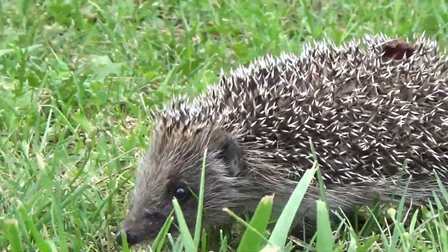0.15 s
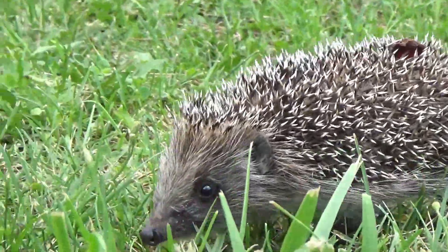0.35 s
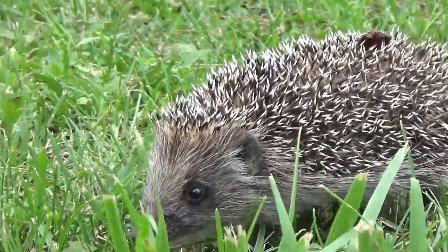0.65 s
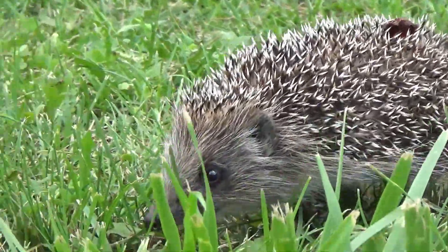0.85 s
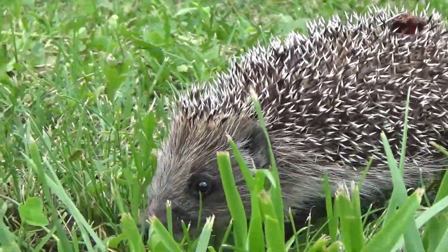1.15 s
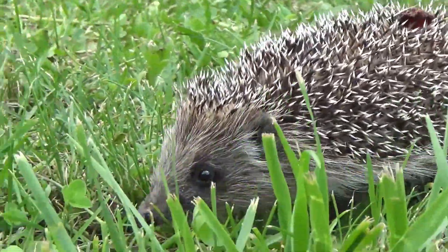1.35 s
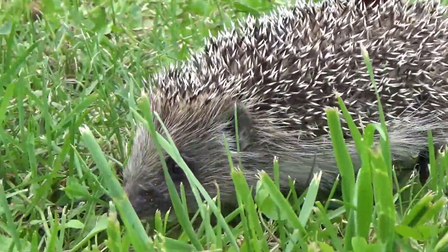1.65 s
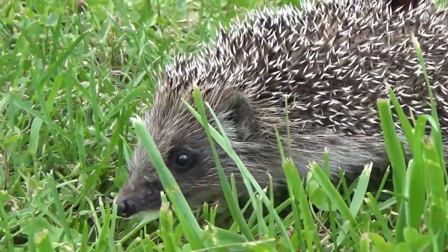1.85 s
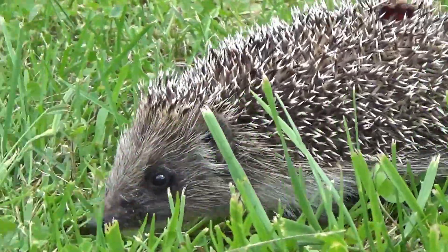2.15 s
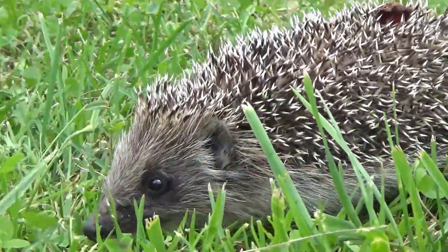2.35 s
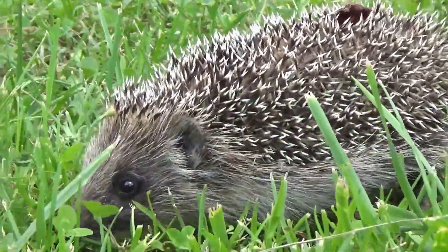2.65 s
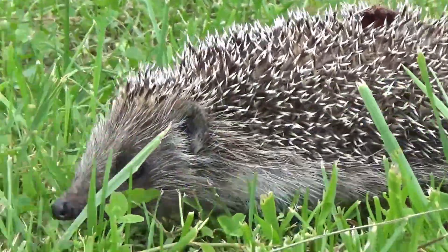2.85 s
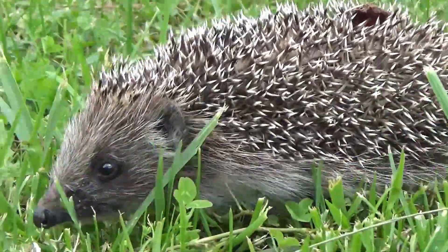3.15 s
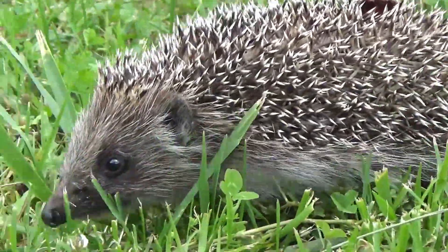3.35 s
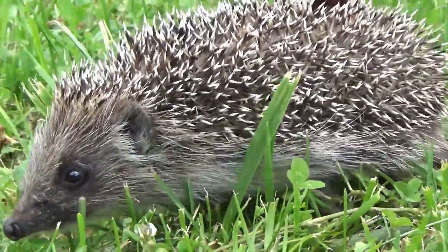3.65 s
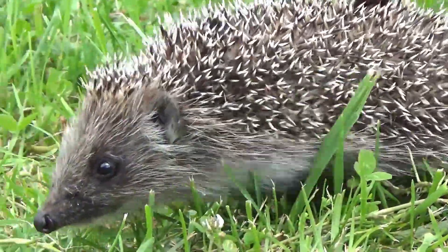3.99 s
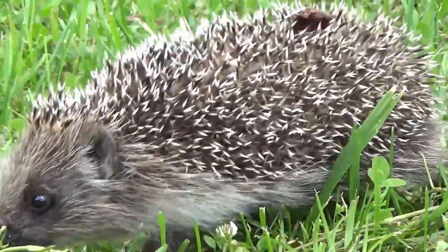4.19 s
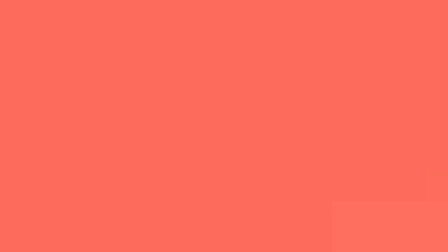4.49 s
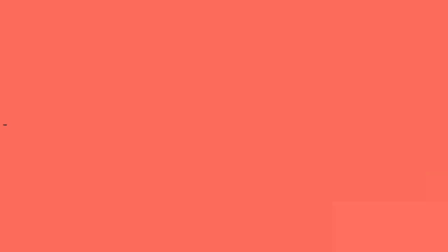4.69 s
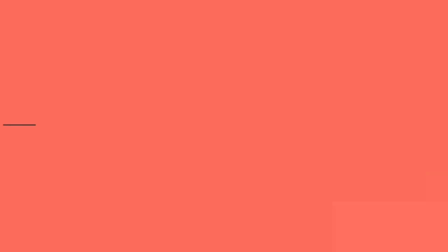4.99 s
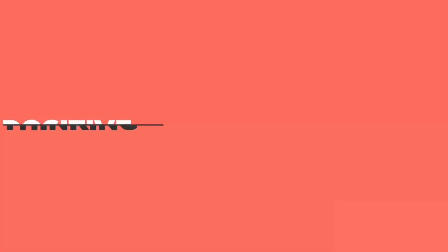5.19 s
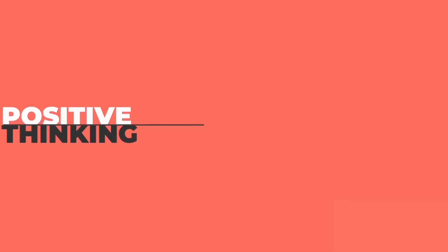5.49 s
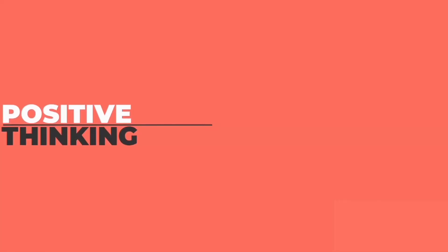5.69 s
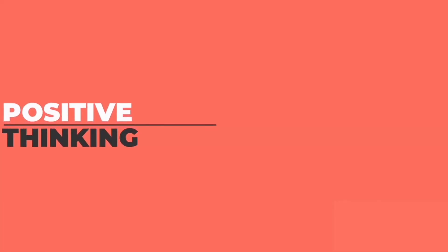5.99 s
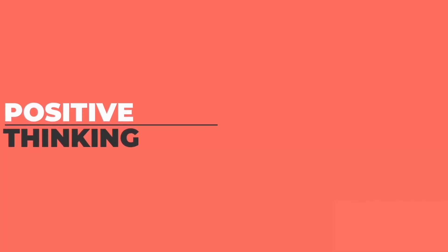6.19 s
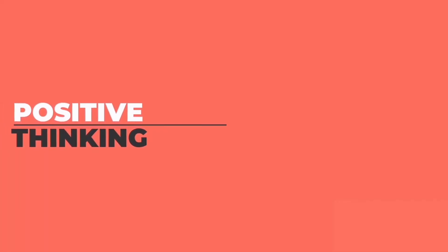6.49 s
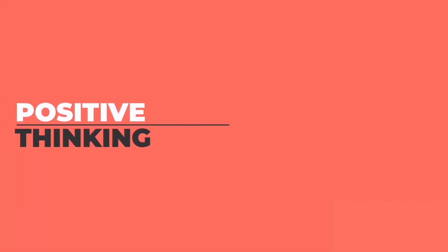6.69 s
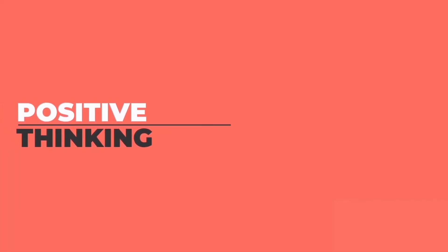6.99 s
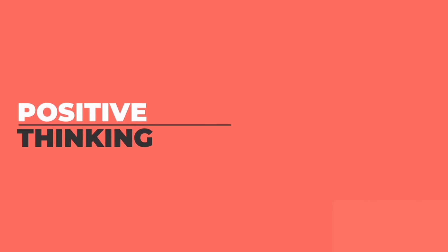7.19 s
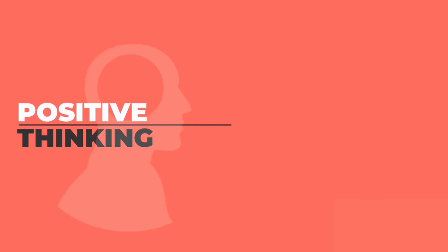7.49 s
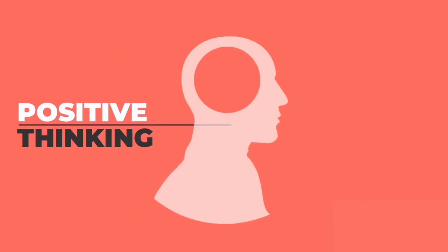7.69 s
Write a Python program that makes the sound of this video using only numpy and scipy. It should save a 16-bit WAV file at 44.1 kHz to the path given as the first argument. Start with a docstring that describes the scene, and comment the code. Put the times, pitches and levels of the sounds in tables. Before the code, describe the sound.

A wide, steady hush of leaves and far air runs throughout, with faint insect bands, flickering thin treble and barely felt low wind. A soft high cricket trills for a quarter second roughly every 0.65 s, from 0.2 to 3.7 s. Faint chirps and weak squawks dot the opening. At 2.65 s a clear whistling bird begins seven short notes, stepping slightly downward and weakening until 3.9 s; hoarse squawks overlap around 2.8-3.1 s. Small breathy chirps cluster near 4-5.2 s. Rough squawks return from 5.2 s, and at 5.3 and 5.55 s two loud raspy screeches erupt close by, the first arching up and down. A long hoarse squawk swells around 5.9 s, more near 6.4-6.6 s. Four fluttering upward whistles start at 6.1, 6.5, 6.9 and 7.25 s, the last cut short. Garden echoes and a faint squawk close at 7.8 s.

```python
"""Hoarse squawks, far and near, in a garden: rough pulses and puffs of air ring a throat's resonances.
Purer birds join them: a falling row of whistles and four upward slurs, near sines with weak overtones.
Faint chirps from farther off blend tone with narrow noise; a cricket trills as a tone cut into strokes.
Sparse decaying taps give the echoes; shaped noise gives leaves, far air, insect bands, thin treble and
a light wind on a pair of microphones."""
import sys
import numpy as np
from scipy import signal
from scipy.io import wavfile
from scipy.ndimage import uniform_filter1d, minimum_filter1d

SR = 44100
rng = np.random.default_rng(int(sys.argv[2]) if len(sys.argv) > 2 else 0)


def generate_wav(signal):
    """Clip the signal to [-1, 1] and save it as 16-bit WAV at the path in sys.argv[1]."""
    frames = np.transpose(np.atleast_2d(signal))
    scaled = np.clip(frames, -1, 1) * 32767
    pcm = np.round(scaled).astype(np.int16)
    wavfile.write(sys.argv[1], SR, pcm)


N = 345744  # samples

# In every table pan_db is left over right.
# Far squawks: start_s, rise_s, fall_s, peak_effort_db, pitch_hz, pan_db, roughness (0-1),
# beak_opening (factor), brightness_db_per_octave, bite_db
FAR_SQUAWKS = [(0.0, 0.0054, 0.16, -35, 420, -10, 0.35, 1.15, -0.5, -2),
               (1.35, 0.16, 0.056, -38.5, 465, 27, 0.45, 1.12, 4, 7),
               (1.74, 0.033, 0.05, -33, 532, 27, 0.33, 0.96, 2, 16),
               (2.75, 0.045, 0.13, -33.5, 424.7, 7, 0.25, 1.08, -4.5, -5.5),
               (2.815, 0.085, 0.08, -27.5, 400, 18, 0.4, 0.96, 0, 7),
               (2.955, 0.077, 0.053, -21, 436.3, 12, 0.39, 0.98, 5.5, 8),
               (3.09, 0.049, 0.054, -26.5, 401.6, 17, 0.65, 1.02, -2.5, 0.5),
               (4.86, 0.056, 0.26, -34.5, 398.2, 3, 0.36, 0.93, 0, -4),
               (5.214, .05, .04, -24, 354.2, 0, .5, 0.97, -4.5, 7.5),
               (5.49, 0.045, .035, -20, 492.3, 3, 0.59, 1.085, 1.5, 6.5),
               (5.93, .25, 0.16, -21.5, 418, 10.5, 0.71, 1.074, -2, -3.5),
               (6.43, 0.12, 0.099, -22.5, 420.7, 14, 0.35, 1.08, -3.5, -7.5),
               (6.585, 0.095, 0.11, -26, 439, 13, 0.35, 1, 4, -1),
               (7.6, 0.11, 0.15, -39.5, 450, -15, 0.41, 0.89, 8, 5)]
SQUAWK_EDGE_DB, SQUAWK_ARCH, BEAK_ARCH = -12, .08, 0.14  # at both ends: effort; droop of pitch, beak (shares)
# Throat resonances of the far squawks: centre_hz, width_hz, level_db
FAR_THROAT = [(970, 595, -4.5), (1634, 460, 5.5), (2484, 740, -1), (3180, 1080, -5), (3760, 630, -8),
              (4760, 1050, -11.5), (6080, 770, -24.5)]

# Nearest bird, one table a screech: time_s, effort_db, pitch_hz, roughness (0-1),
# brightness_db_per_octave, bite_db
NEAR_SCREECHES = [
    [(5.295, -30, 535, .12, -3, 12), (5.315, -21, 591.8, .13, 2, 11.5), (5.343, -15, 716.7, 0.24, -4, 1.5),
     (5.37, -12, 689.3, .58, -1.5, 3), (5.405, -11.5, 600, .58, -2.5, 1),
     (5.445, -15.5, 496.4, 0.28, -1, 2), (5.49, -30.5, 418, 0.24, 6, -4)],
    [(5.535, -20, 438, 0.5, -5, 6), (5.552, -15, 514.6, 0.28, 1.5, 5), (5.572, -16, 600.6, 0.25, -4, 2.5),
     (5.59, -12.5, 558, 0.37, -3, 4), (5.602, -17.5, 567.5, 0.42, -1.5, 0),
     (5.622, -15, 516.5, 0.45, -3, 1), (5.64, -44.5, 480, 0.2, 2, -2)],
]
# Throat with the beak wide open, first screech: centre_hz, width_hz, level_db
WIDE_THROAT = [(1225, 810, -3), (2130, 600, 5.5), (3020, 570, 3), (4540, 800, -13), (5130, 630, -9),
               (6150, 600, -20.5)]
# Throat with the beak half shut, second screech: centre_hz, width_hz, level_db
HALF_SHUT_THROAT = [(990, 540, -20), (1590, 280, 9), (2580, 800, -2), (3560, 1000, -7), (5020, 1200, -12.5)]
BEAK_REST_HZ, BEAK_FOLLOW, NEAR_PAN_DB = 576, 0.76, -2.5  # the beak opens as the pitch climbs

BITE_HZ, BITE_OCTAVES = 2780, 0.27  # where a strained throat bites
THROAT_DRIFT, THROAT_SWAY_DB, CRACK_DB = .035, 1.8, 2.6  # drift is a share of each resonance's centre
SKULL_HZ, SKULL_FOLLOW = 4000, .2  # resonances above this hardly move with the beak
PITCH_SWAY = .04  # slow waver of the pitch, a share, scaled by roughness

# Level whistles: start_s, length_s, pitch_hz, drift_hz_per_s, level_db, dip_db (mid-note), pan_db
WHISTLE_NOTES = [(2.655, 0.15, 3630, 298, -17.5, 0, 4.5), (2.955, 0.13, 3570, 101, -18.5, 0, -4),
                 (3.174, 0.11, 3532, -800, -24, -11, 0), (3.354, 0.11, 3492, -600, -23, -6, 4),
                 (3.524, 0.11, 3448, -500, -22.5, -7, -4), (3.686, 0.11, 3382, -1200, -25, -3, -2),
                 (3.847, 0.06, 3336, -1800, -30, 0, 8)]
# Partials of a whistle: multiple, level_db
WHISTLE_PARTIALS = [(1, 1), (2, -27.5), (3, -31)]
WHISTLE_ATTACK, WHISTLE_RELEASE_S = .25, 0.026  # attack is a share of the length
WHISTLE_EDGE_DB, WHISTLE_SWELL_DB = -19.5, 2.5
SCOOP_HZ, SCOOP_S = 254, 0.0372  # the pitch scoops up to the note
DIP_AT, DIP_S = 0.524, 0.0062  # share of the length, half width

# Upward slurs: start_s, slowness (factor), level_db, broken_off_after_s, overtone_fade_db_per_s
SLUR_CALLS = [(6.077, 1.054, -14.5, .4, -45), (6.48, 0.97, -15.5, .4, -30), (6.863, 1.0, -15.5, .4, -7),
              (7.258, 1.02, -16.5, .21, -83)]
# Course of one slur before stretching: time_s, pitch_hz, level_db, flutter (0-1)
SLUR_COURSE = [(0, 2164, -2, 0), (.022, 2175, -1.5, 0.07), (.085, 2415, 2, 0.23), (.108, 2532, -10.5, 0.9),
               (.165, 2710, -10, 0.45), (.23, 2887, -12.5, 0), (.29, 2955, -13, 0), (.31, 2940, -6.5, 0.2),
               (.334, 2480, 1, 0.15), (.343, 2500, -23, 0)]
SLUR_OVERTONE_DB = -23.5  # the octave at the start of a slur

# Chirps of farther birds: start_s, length_s, first_pitch_hz, last_pitch_hz, upward_bend_hz,
# level_db, unsteadiness (0-1)
FAR_CHIRPS = [(0, 0.54, 6220, 6400, 2.5, -46, 0.38), (.07, .045, 1310, 1310, 5, -38, 0.1),
              (0.1, 0.32, 3480, 3500, 30.5, -47, 0.13), (0.256, 0.055, 1180, 1140, -2, -40, 0.14),
              (0.42, 0.054, 1093, 1054, -6, -43.5, 0.2), (0.441, 0.093, 2620, 2495, 13.5, -42.5, 0.5),
              (0.83, 0.16, 1164, 1033, -9.5, -41.5, 0.1), (1.793, 0.058, 3450, 3400, 0, -48, 0.1),
              (3.925, 0.087, 3250, 2600, -58, -37.5, 0.88), (4.004, 0.071, 3010, 2160, 9, -37.5, 0.8),
              (4.159, 0.19, 1520, 1458, 7, -43.5, 0.76), (4.497, 0.08, 2230, 2300, 298.5, -36.5, 0.75),
              (4.546, 0.041, 3400, 3640, 50, -41, 0.85), (4.552, 0.079, 1300, 1270, 34, -39, 0.5),
              (4.556, 0.085, 2440, 2470, 252, -39, .75), (4.577, .045, 3900, 3920, 300, -42, 0.9),
              (4.875, .04, 3650, 4000, 100, -40, 0.24), (4.884, 0.079, 2600, 2410, 50, -44, 0.5),
              (4.886, 0.053, 5440, 4900, -3, -40, 0.77), (4.912, 0.038, 3720, 3440, -9, -35.5, 0.42),
              (5.082, 0.1, 736, 783, 20.5, -32.5, 0.12), (5.1, 0.099, 4480, 4620, 54, -42, 0.25),
              (5.145, 0.04, 3760, 3660, 31, -32, 0.62), (5.15, 0.057, 2450, 2370, 112, -36.5, 0.7),
              (5.163, 0.034, 5100, 5100, -4, -40, 0.7), (5.171, .055, 1150, 1103, 17, -32, 0.15),
              (6.639, 0.11, 3680, 3620, 40, -34.5, 0.63), (6.648, .08, 4700, 4840, 58, -33, 0.9),
              (7.508, .035, 2200, 2180, 5, -38, .5)]
BLUR_HZ = 262  # width of a chirp's smear at full unsteadiness

# Cricket trills: start_s, end_s, level_db
CRICKET_TRILLS = [(0.18, .44, -49), (0.802, 1.065, -48.5), (1.503, 1.765, -49.5), (2.151, 2.41, -48.5),
                  (2.825, 3.08, -47), (3.478, 3.735, -48.5)]
CRICKET_HZ, STROKES_PER_S = 7120, 43.0

# Echo decay of trees and walls: frequency_hz, t60_s
GARDEN_DECAY = [(300, 2.5), (1500, 1.21), (3500, 1.67), (8000, 1.55)]

# Spectrum shape of leaves and far air: frequency_hz, relative_level_db_per_hz
HUSH_SPECTRUM = [(15, -61.5), (25, -2), (102, -25.5), (132, -12), (589, -0.5), (679, -2), (1120, 0.5),
                 (1320, -0.5), (1930, 0), (2510, -7), (4230, -12), (5230, -15.5), (7300, -18), (9490, -49),
                 (16100, -120)]
HUSH_DB = -34
# Swell of the hush, added to its level: time_s, swell_db
HUSH_SWELLS = [(0, 4.5), (.6, -0.56), (2.6, 1.05), (3.3, 1), (4.4, 1.6), (5.7, 4), (7.0, 2), (7.84, 1)]
# Likeness of the hush in left and right: frequency_hz, likeness (-1 to 1)
HUSH_LIKENESS = [(60, -0.62), (180, -0.61), (550, -0.21), (1650, -0.8), (4970, -0.31), (15000, 1)]
# Steady insect bands and a low hum: centre_hz, width_hz, level_db
DRONE_BANDS = [(99.7, 8.8, -66), (4210, 570, -51.5), (6854, 300, -53)]
# Spectrum shape of the thin flickering treble: frequency_hz, relative_level_db_per_hz
FIZZ_SPECTRUM = [(7300, -51), (7500, -3.5), (8300, -20), (8700, -40), (9100, -10), (9400, -4.5),
                 (10000, -6), (10300, -14), (11000, -9.5), (12500, -0.5), (14800, -1.5), (15700, -13)]
FIZZ_DB = -54.5
# Likeness of the treble in left and right: frequency_hz, likeness (-1 to 1)
FIZZ_LIKENESS = [(8000, -0.24), (9300, 0.56), (10200, 0.58), (11500, -0.53), (15000, -0.43)]
# Low wind on the microphones: time_s, level_db
BREEZE_LEVEL = [(0, -66), (2.4, -79), (2.8, -60), (3.5, -57), (4.1, -74), (7.84, -66)]
EDGE_HZ = 15800  # upper band limit


def gain_of(db):
    """Decibels to gain."""
    return 10 ** (np.asarray(db) / 20)


def evened(x):
    """Scales to rms 1."""
    return x / np.sqrt(np.mean(x ** 2) + 1e-20)


def read(points, hz):
    """Reads a spectrum on a log-frequency axis."""
    f, value = np.transpose(points)
    return np.interp(np.log(hz + 1), np.log(f + 1), value)


def unroll(rows):
    """Start time and the columns of a table, one value a sample."""
    s, *columns = np.transpose(rows)
    t = np.arange(s[0], s[-1], 1 / SR)
    return s[0], [np.interp(t, s, c) for c in columns]


def add(mix, s, sound, pan_db):
    """Places a sound (one or two channels) left and right; the mean of both gains stays 1."""
    left = 2 / (1 + gain_of(-pan_db * np.ones(sound.shape[-1])))
    part = mix[:, round(s * SR):][:, :sound.shape[-1]]
    part += (sound * np.array([left, 2 - left]))[:, :part.shape[1]]


def wander(length, smooth):
    """Smooth random curve of rms 1."""
    once = uniform_filter1d(rng.standard_normal(length), int(smooth))
    return evened(uniform_filter1d(once, int(smooth)))


def resonate(x, hz, width):
    """Resonance of gain 1: shifts the curve hz down to zero, smooths twice and shifts back."""
    turn = np.exp(2j * np.pi * np.cumsum(hz * np.ones(x.shape[-1])) / SR)
    r = np.exp(-np.pi * width / SR)
    smoothed = signal.lfilter([(1 - r) ** 2], [1, -2 * r, r * r], x / turn + 1e-18)
    return 2 * (turn * smoothed).real


def voice_source(hz, rough):
    """Unsteady overtone pulses give way to puffs of air as the voice roughens."""
    n = len(hz)
    jitter, sway = .09 * wander(n, 160), PITCH_SWAY * wander(n, 1500)
    turns = np.cumsum(hz * (1 + rough * (jitter + sway))) / SR
    pulses = 0
    for k in range(1, 17):  # every overtone swells and fades on its own
        pulses = pulses + gain_of(3.0 * wander(n, 500)) * np.cos(2 * np.pi * k * turns + .4 * k * k)
    # uneven, strong-weak pulses
    pulses *= 1 + 0.93 * rough * wander(n, 47) + 0.5 * rough * np.cos(np.pi * turns)
    # one random strength a puff: a few snap hard
    cracks = gain_of(CRACK_DB * np.minimum(rng.exponential(1, n), 4))[turns.astype(int)]
    puffs = (0.27 + cracks * np.exp(-(turns % 1) / 0.064)) * rng.standard_normal(n)
    return (1 - rough) * evened(pulses) + .55 * rough * evened(puffs)


def squawk(mix, s, effort_db, hz, rough, beak, bright_db, bite_db, pan_db, modes, fade):
    """Pulses and puffs pass a restless throat whose resonances shift as the beak opens."""
    n = len(hz)
    rough, beak = np.clip(rough, 0, 1), np.clip(beak, .82, 1.18)
    drive = voice_source(hz, rough)
    throat = 0
    for k, (f, width, db) in enumerate(modes):
        bite = np.exp(-(np.log2(f / BITE_HZ) / BITE_OCTAVES) ** 2)
        colour_db = db + bright_db * np.log2(f / 1650) + bite_db * bite
        follow = SKULL_FOLLOW if f > SKULL_HZ else 1
        centre = f * beak ** follow * (1 + THROAT_DRIFT * wander(n, 900))
        gain = gain_of(colour_db + THROAT_SWAY_DB * wander(n, 700))
        throat = throat + (-1) ** k * gain * resonate(drive, centre, width)
    # effort alone sets the level
    loudness = np.sqrt(abs(uniform_filter1d(throat ** 2, size=500)) + 1e-12)
    shape = signal.windows.tukey(n, min(fade, 1))
    add(mix, s, gain_of(effort_db) * throat / loudness * shape, pan_db)


def squawkers():
    """Each far squawk swells to its peak and sinks again; pitch and beak droop towards both ends."""
    mix = np.zeros((2, N))
    for s, rise, fall, peak_db, hz, pan_db, rough, beak, bright_db, bite_db in FAR_SQUAWKS:
        t = np.arange(-rise, fall, 1 / SR)
        droop = np.where(t < 0, t / rise, t / fall) ** 2
        squawk(mix, s, peak_db + SQUAWK_EDGE_DB * droop, hz * (1 - SQUAWK_ARCH * droop), rough,
               beak * (1 - BEAK_ARCH * droop), bright_db, bite_db, pan_db, FAR_THROAT, fade=0.073)
    return mix


def screecher():
    """Two loud screeches close by, thrown back by a wall a few metres off."""
    mix = np.zeros((2, N))
    for rows, modes in zip(NEAR_SCREECHES, (WIDE_THROAT, HALF_SHUT_THROAT)):
        s, (effort_db, hz, rough, bright_db, bite_db) = unroll(rows)
        beak = (hz / BEAK_REST_HZ) ** BEAK_FOLLOW
        squawk(mix, s, effort_db, hz, rough, beak, bright_db, bite_db, NEAR_PAN_DB, modes, fade=0.15)
    mix[:, 1150:] += gain_of(-13) * mix[::-1, :-1150]  # delay in samples, sides swapped
    return mix


def whistle(hz, level_db, tones, flutter, apart, sway):
    """Near sine with a 76 Hz flutter, widened: left and right differ by `apart` radians, swaying."""
    t = np.arange(len(hz)) / SR
    gap = apart + sway * wander(len(hz), 1900)
    phase = 2 * np.pi * np.cumsum(hz) / SR + np.array([gap, -gap]) / 2
    tone = sum(gain_of(db) * np.sin(k * phase) for k, db in tones)
    trill = np.sin(2 * np.pi * 76 * t) + .5 * wander(len(hz), 110)
    shake = 1 + np.clip(flutter, 0, 1) * trill
    return np.sqrt(2) * gain_of(level_db) * tone * shake * signal.windows.tukey(len(hz), .1)


def whistler(mix):
    """Pure whistles scoop up to a drifting pitch; in some the level dips briefly in the middle."""
    for s, length, hz, drift, db, dip_db, pan_db in WHISTLE_NOTES:
        t = np.arange(0, length, 1 / SR)
        opening = np.clip(1 - t / (WHISTLE_ATTACK * length), 0, 1)
        closing = np.clip(1 - (length - t) / WHISTLE_RELEASE_S, 0, 1)
        level_db = db + WHISTLE_EDGE_DB * (opening + closing) + WHISTLE_SWELL_DB * (t / length - .5)
        level_db += min(dip_db, 0) * np.exp(-((t - DIP_AT * length) / DIP_S) ** 2)
        pitch = hz + drift * (t - SCOOP_S) - SCOOP_HZ * np.clip(1 - t / SCOOP_S, 0, 1) ** 2
        note = whistle(pitch, level_db, WHISTLE_PARTIALS, flutter=.03, apart=0.64, sway=0.41)
        add(mix, s, note, pan_db)


def slurring_bird(mix):
    """One fluttering upward slur, stretched anew each time, over a fading octave."""
    for s, slowness, db, stop, fade_db in SLUR_CALLS:
        course = unroll(np.multiply(SLUR_COURSE, [slowness, 1, 1, 1]))[1]
        hz, level_db, flutter = np.array(course)[:, :round(stop * SR)]
        tones = [(1, 0), (2, SLUR_OVERTONE_DB + fade_db * np.arange(len(hz)) / SR)]
        add(mix, s, whistle(hz, db + level_db, tones, flutter, apart=2.35, sway=.12), pan_db=-.3)


def songbirds():
    """The whistler and the slurring bird together."""
    mix = np.zeros((2, N))
    whistler(mix)
    slurring_bird(mix)
    return mix


def far_birds():
    """Faint chirps: a wavering tone that turns into a breathy smear as it grows unsteady."""
    mix = np.zeros((2, N))
    for s, length, first_hz, last_hz, bend, db, unsteady in FAR_CHIRPS:
        u = np.arange(0, 1, 1 / (length * SR))  # share of the chirp
        unsteady = np.clip(unsteady, .05, 1)
        glide = first_hz + (last_hz - first_hz) * u + bend * np.sin(np.pi * u)
        hz = glide + 110 * unsteady * wander(len(u), 120)
        level_db = db - 6.0 * (2 * u - 1) ** 2
        tone = whistle(hz, level_db, [(1, 0)], flutter=.8 * unsteady, apart=.8, sway=.6)
        smear = evened(resonate(rng.standard_normal((2, len(u))), hz, BLUR_HZ * unsteady))
        smear *= gain_of(level_db) * signal.windows.tukey(len(u), .4)
        add(mix, s, np.sqrt(1 - unsteady ** 2) * tone + unsteady * smear, pan_db=1.5)
    return mix


def cricket():
    """Each wing stroke swells and fades a high ringing tone; the first strokes are a little flat."""
    mix = np.zeros((2, N))
    for start, end, db in CRICKET_TRILLS:
        t = np.arange(0, end - start, 1 / SR)
        strokes = np.sin(np.pi * STROKES_PER_S * t) ** 3
        bent_t = t + 0.0012 * np.exp(-t / 0.03)
        ring = np.sin(2 * np.pi * CRICKET_HZ * bent_t + .5 * wander(len(t), 91))
        add(mix, start, gain_of(db) * evened(abs(strokes) * ring), pan_db=-0.5)
    return mix


def garden(x):
    """Sparse echoes of random sign from trees and walls, each band dying at its own speed."""
    taps = np.zeros((2, SR))
    at = np.arange(500, SR - 20, 20) + rng.integers(0, 20, (2, (SR - 501) // 20))
    np.put_along_axis(taps, at, rng.choice([-1., 1.], at.shape), 1)
    hz, t, z = signal.stft(taps, SR, nperseg=256)
    decay = gain_of(-60 * t / read(GARDEN_DECAY, hz)[:, None])
    tail = signal.istft(z * decay, SR, nperseg=256)[1]
    spread = x + .35 * x[::-1]  # each side leaks into the other
    return signal.fftconvolve(spread, tail / np.linalg.norm(tail[0]), axes=1)[:, :N]


def noise(spectrum, likeness, patchy_db, flicker_db, size):
    """Two partly alike channels of random short-time spectra with drifting patches and shared flicker."""
    frames, hz = 4 * N // size + 5, np.fft.rfftfreq(size, 1 / SR)
    a, b, c, d, patches = rng.standard_normal((frames, len(hz), 5)).T
    patches = evened(uniform_filter1d(uniform_filter1d(patches, 14, 0), 8, 1))
    same = np.clip(read(likeness, hz), -1, 1)[:, None]
    left = a + 1j * b
    z = np.array([left, same * left + np.sqrt(1 - same ** 2) * (c + 1j * d)])
    shape_db = read(spectrum, hz)[:, None]
    z *= gain_of(shape_db + patchy_db * patches + flicker_db * wander(frames, 9))
    return evened(signal.istft(z, nperseg=size, noverlap=3 * size // 4)[1][:, :N])


def hush():
    """Leaves and far air with steady bands, and apart from them a thin treble that comes and goes."""
    swell_db = np.interp(np.arange(N) / SR, *np.transpose(HUSH_SWELLS))
    air = noise(HUSH_SPECTRUM, HUSH_LIKENESS, patchy_db=1.5, flicker_db=.3, size=1024)
    side_db = np.array([[.9], [-.9]])  # a little louder on the left
    out = gain_of(HUSH_DB + swell_db + side_db) * air
    for hz, width, db in DRONE_BANDS:
        out += gain_of(db) * evened(resonate(rng.standard_normal((2, N)), hz, width))
    fizz = noise(FIZZ_SPECTRUM, FIZZ_LIKENESS, patchy_db=3.5, flicker_db=2.0, size=1024)
    return out, gain_of(FIZZ_DB) * fizz


def breeze():
    """A light wind presses on each microphone on its own, as noise around 24 Hz."""
    level_db = np.interp(np.arange(N) / SR, *np.transpose(BREEZE_LEVEL))
    return gain_of(level_db) * evened(resonate(rng.standard_normal((2, N)), 24, 22))


def scene():
    """Birds, echoes and hush; squawks, echoes and hush are cut off steeply at about 7.4 kHz."""
    far, near, song, chirps = squawkers(), screecher(), songbirds(), far_birds()
    air, fizz = hush()
    to_garden = gain_of(-6.5) * far + gain_of(-9.5) * near + gain_of(-11.5) * song + gain_of(-6.5) * chirps
    hoarse = far + near + air + garden(to_garden)
    low_pass = signal.firwin(401, 7450, window=("kaiser", 7), fs=SR)
    cut_off = signal.oaconvolve(hoarse, low_pass[None], "same")
    return cut_off + song + chirps + cricket() + fizz + breeze()


def record(dry):
    """A limiter eases the gain down around peaks over .87; then the band limit."""
    allowed = minimum_filter1d(np.minimum(.87 / (abs(dry).max(0) + 1e-9), 1), size=441)
    limited = dry * uniform_filter1d(allowed, size=441)
    band = signal.firwin(511, EDGE_HZ, window=("kaiser", 9), fs=SR)
    return signal.oaconvolve(limited, band[None], "same")


dry = scene()
out = record(dry)
generate_wav(out)
```